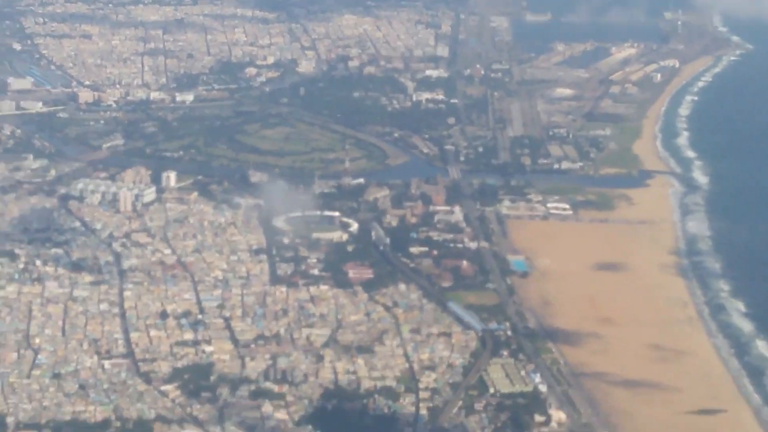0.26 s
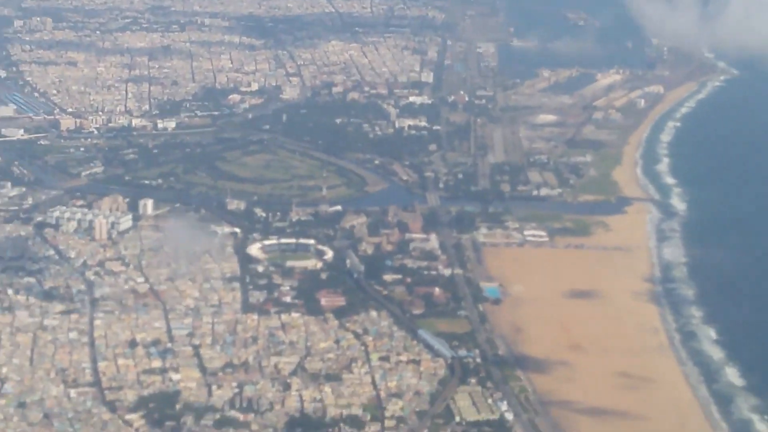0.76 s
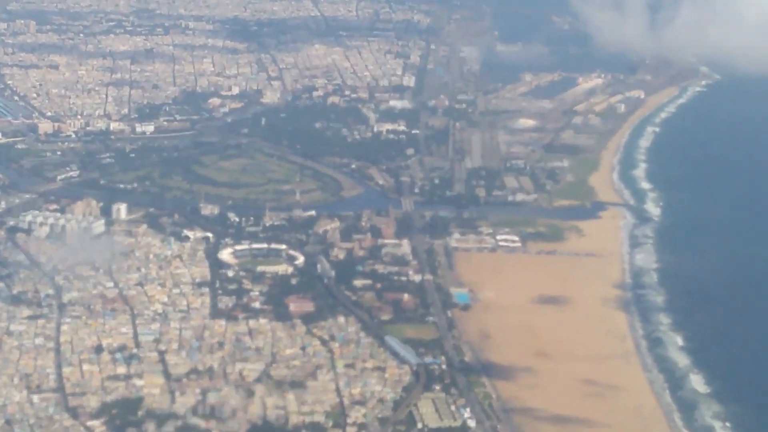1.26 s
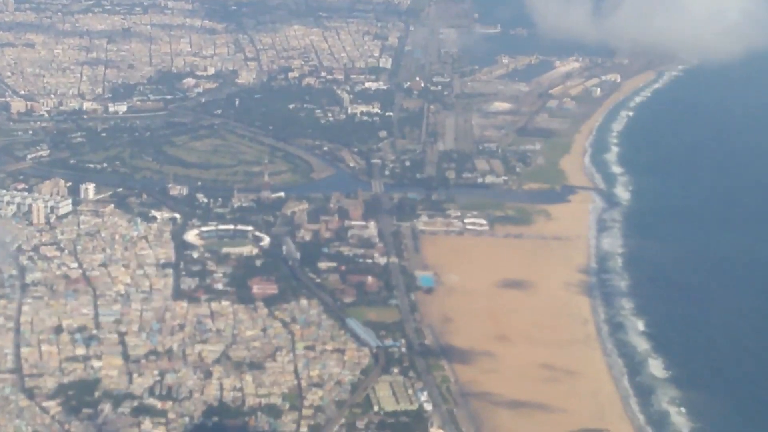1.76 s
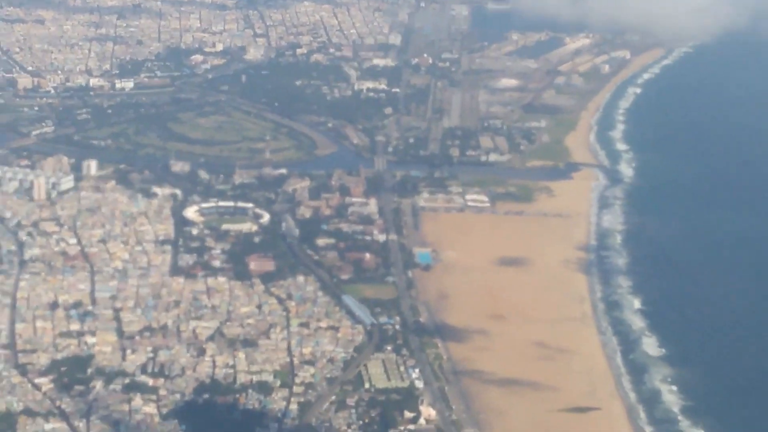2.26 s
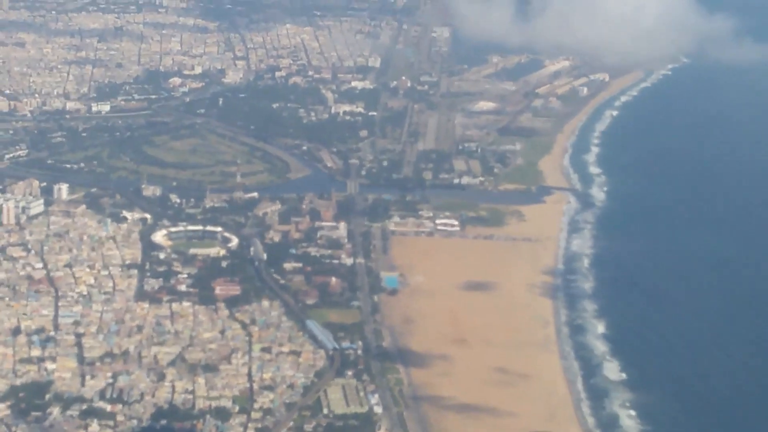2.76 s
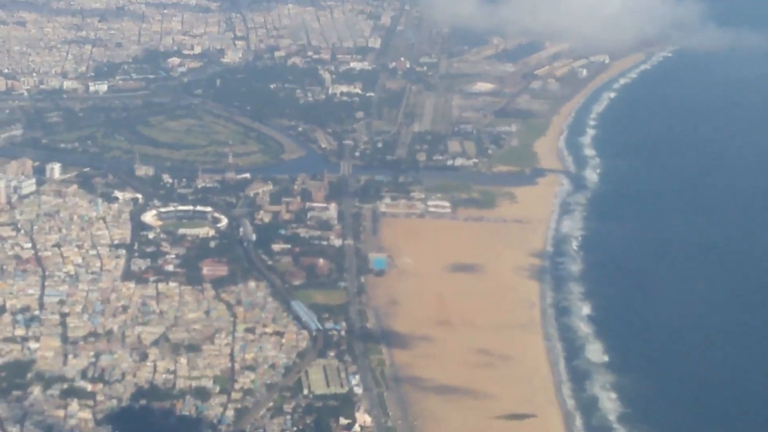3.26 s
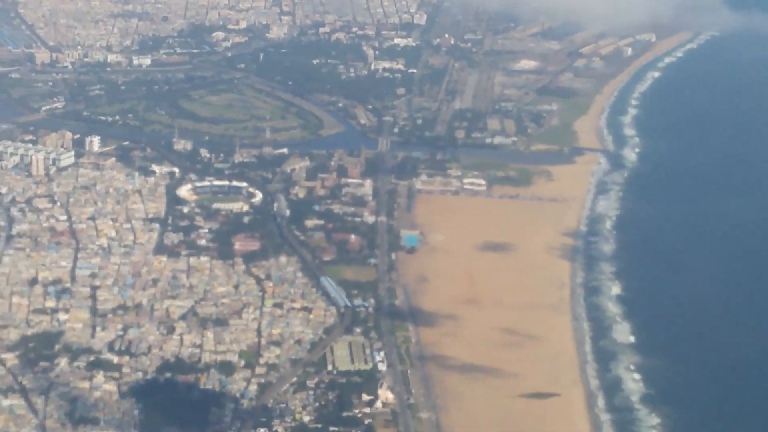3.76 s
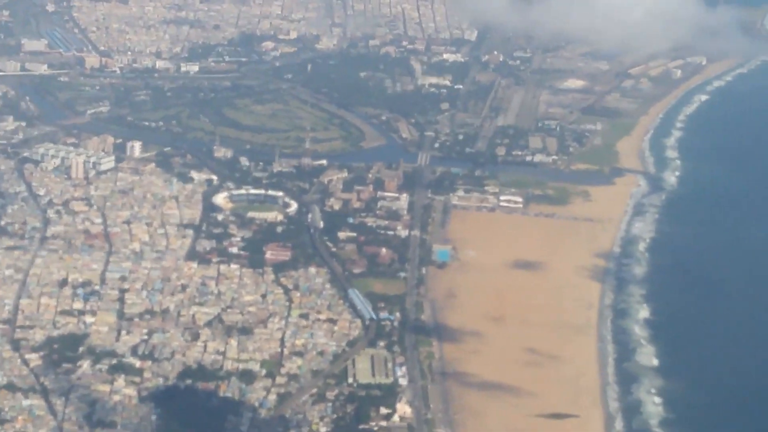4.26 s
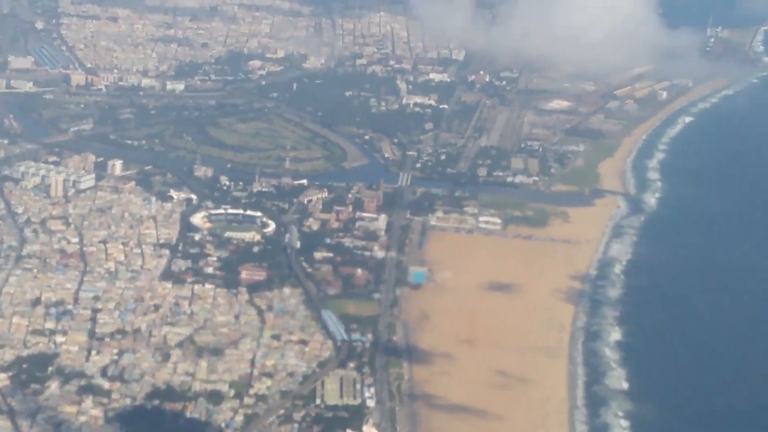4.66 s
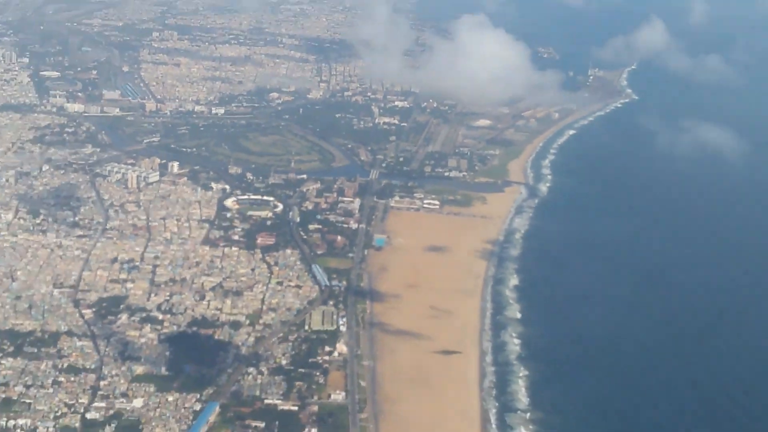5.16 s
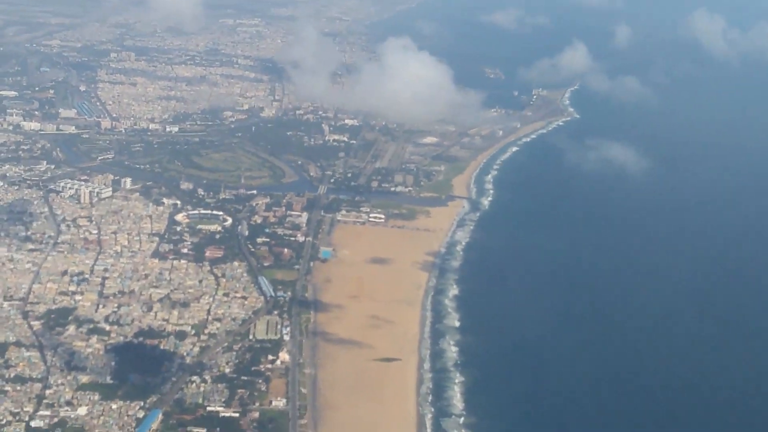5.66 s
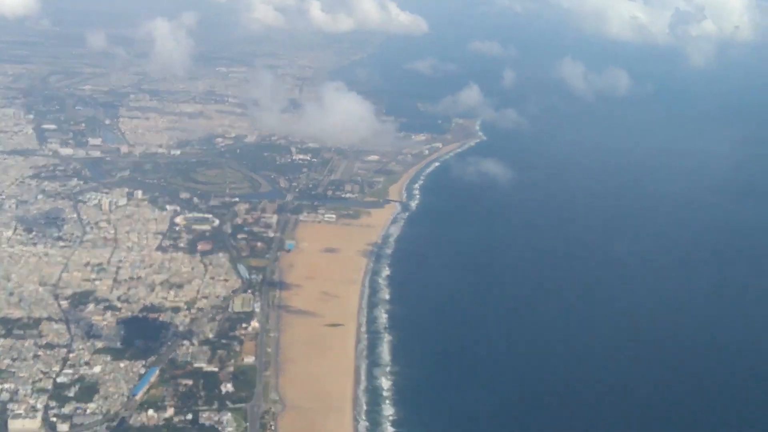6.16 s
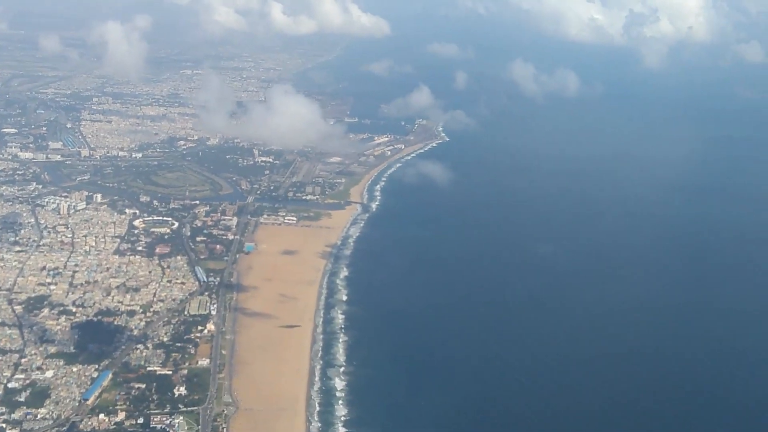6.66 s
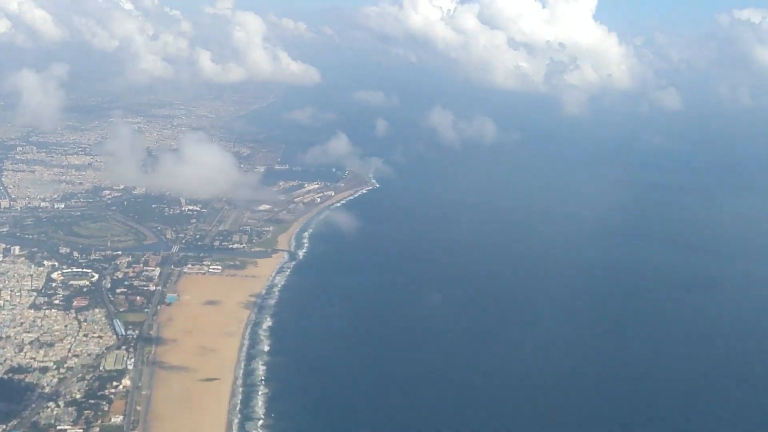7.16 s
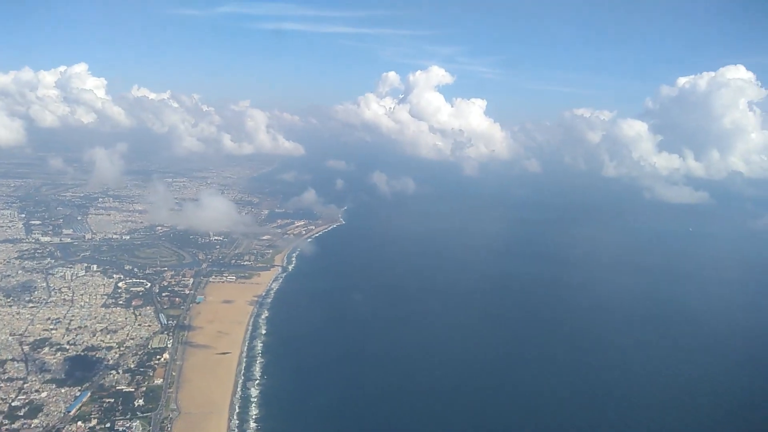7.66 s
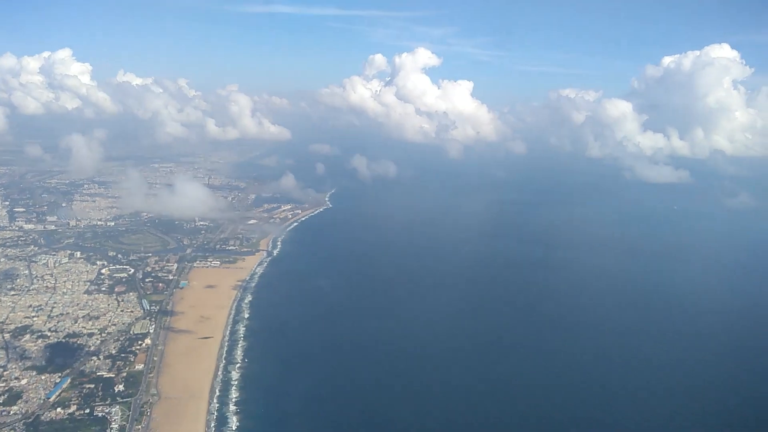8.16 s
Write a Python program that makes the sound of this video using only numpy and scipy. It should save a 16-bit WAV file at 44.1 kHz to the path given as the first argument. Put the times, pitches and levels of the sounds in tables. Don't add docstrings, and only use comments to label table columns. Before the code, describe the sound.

Loud, constant low jet roar inside an airliner cabin, with booming buffets and airflow rush, crushed into rough, crackling distortion by an overloaded small microphone.

```python
import sys
import numpy as np
from scipy import signal
from scipy.fft import rfft, irfft, next_fast_len
from scipy.io import wavfile
from scipy.ndimage import uniform_filter1d, minimum_filter1d

SR = 44100
rng = np.random.default_rng(int(sys.argv[2]) if len(sys.argv) > 2 else 0)


def transcribe(u):
    v = np.clip(np.atleast_2d(u).T, -1, 1)
    q = np.round(v * 32767).astype(np.int16)
    wavfile.write(sys.argv[1], SR, q)


def gain_from_db(level_db):
    decades = np.asarray(level_db, float) / 20
    return 10 ** decades


N = 370435
TIME_S = np.arange(N) / SR
COARSE_S = np.arange(0, N, 64) / SR


def evened(x):
    return x / np.sqrt(np.mean(x ** 2) + 1e-20)


def noise(spectrum):
    hz, db = np.transpose(spectrum)
    size = next_fast_len(N)
    bin_hz = np.fft.rfftfreq(size, 1 / SR)
    white = rfft(rng.standard_normal(size))
    shape_db = np.interp(np.log(bin_hz + 1), np.log(hz + 1), db)
    return evened(irfft(white * gain_from_db(shape_db), size)[:N])


def swells(rows, half_width_s):
    bells_db = sum(db * np.exp(-((COARSE_S - s) / half_width_s) ** 2) for s, db in rows)
    return np.interp(TIME_S, COARSE_S, bells_db)


def wander():
    rates_hz = np.geomspace(.5, 9, 30)
    waves = sum(np.sin(2 * np.pi * (hz * COARSE_S + rng.random())) for hz in rates_hz)
    return np.interp(TIME_S, COARSE_S, evened(waves))


# time in seconds, level in dB.
SHAFT_LEVELS = [(0.0, -22.5), (0.37, -14.5), (0.51, -32.5), (0.61, -20), (2.83, -22.5), (2.9, -32.5),
                (2.97, -19), (4.52, -23.5), (4.89, -14.5), (4.96, -23), (5.36, -17), (5.92, -22),
                (6.6, -17.5), (6.69, -32), (6.81, -17), (7.16, -23), (8.24, -17), (8.4, -27)]


def shaft_hum():
    s, db = np.transpose(SHAFT_LEVELS)
    shaft_hz, trim_db = 78.7, -1.5
    level_db = np.interp(TIME_S, s, db) + trim_db
    return np.sqrt(2) * gain_from_db(level_db) * np.sin(2 * np.pi * shaft_hz * TIME_S)


# centre in seconds, swell in dB.
BUFFETS = [(.16, 9), (.26, 8.5), (.37, 6), (1.0, 3), (1.38, 2.5), (2.06, 10), (2.4, 7.5), (3.44, 10),
           (4.49, 6.5), (4.61, 12), (4.91, 6), (5.17, 3), (5.89, 8.5), (6.88, 3), (7.24, 8.5), (7.51, 9.5),
           (7.78, 7), (8.0, 4.5), (8.28, 6)]


def buffet_swell_db():
    return swells(BUFFETS, half_width_s=0.04)


# centre in seconds, swell in dB.
SURGES = [(.09, 3), (.76, 8), (1.08, 0), (1.59, 7), (1.85, 3.5), (2.1, 1), (2.48, 0.5), (3.58, 9.5),
          (4.3, 4.5), (5.01, 2.5), (5.17, 3.5), (5.96, 5.5), (6.64, 4.5), (7.39, 1.5), (7.7, 1.5),
          (7.95, 6), (8.05, 6), (8.28, 5)]


def surge_swell_db():
    return swells(SURGES, half_width_s=0.039)


# frequency in Hz, density in dB per Hz.
RUSH_SPECTRUM = [(150, -25.5), (225, -3), (245, -1), (260, 4.5), (280, -0.5), (340, -2), (450, -19),
                 (700, -21.5), (1200, -43.5), (2500, -68), (6000, -62), (11000, -71), (16000, -77.5)]


def air_rush():
    level_db = -19.5 - 0.31 * buffet_swell_db() + 1.25 * wander()
    return gain_from_db(level_db) * noise(RUSH_SPECTRUM)


# frequency in Hz, density in dB per Hz.
BOOM_SPECTRUM = [(20, -10), (40, 0.5), (55, 2.5), (68, -2), (90, -23.5), (200, -78)]


def hull_boom():
    level_db = -20 + buffet_swell_db() - 0.8 * surge_swell_db() + 1.5 * wander()
    return gain_from_db(level_db) * noise(BOOM_SPECTRUM)


# frequency in Hz, density in dB per Hz.
ROAR_SPECTRUM = [(60, -34), (88, -2.5), (112, -2.5), (137, 0), (170, 2.5), (190, -4.5), (210, -1.5),
                 (240, -14), (500, -77)]


def jet_roar():
    level_db = -17.5 + surge_swell_db() - 0.18 * buffet_swell_db() + 1.5 * wander()
    return gain_from_db(level_db) * noise(ROAR_SPECTRUM)


def scene():
    return (shaft_hum() + air_rush() + hull_boom() + jet_roar())[None]


def port_resonance(x):
    port_hz, width_hz = 12000, 600
    turn = np.exp(2j * np.pi * port_hz * TIME_S)
    r = np.exp(-np.pi * width_hz / SR)
    return 2 * (turn * signal.lfilter([1 - r], [1, -r], x / turn)).real


def capsules(x):
    front_drive_db, rear_drive_db, rear_share = 19.5, 32.5, 0.098
    front = x + gain_from_db(-26) * port_resonance(x)
    rear = signal.lfilter(*signal.butter(2, 365, fs=SR), x)
    front = np.clip(gain_from_db(front_drive_db) * front, -1, 1)
    rear = np.clip(gain_from_db(rear_drive_db) * rear, -1, 1)
    squeeze, squeeze_s = 1, 0.0057
    span = int(squeeze_s * SR)
    power = uniform_filter1d(uniform_filter1d(evened(x) ** 2, span), span)
    return ((1 - rear_share) * front + rear_share * rear) * (power + 0.27) ** (-squeeze / 2)


# time in seconds, peak in dB.
SLIPS = [(0.206, -28), (0.5367, -20.5), (0.976, -44), (1.105, -21), (1.3917, -23), (1.5783, -25),
         (1.7883, -25), (2.122, -26), (2.1554, -28), (2.353, -20), (2.4189, -25), (2.6596, -22),
         (2.703, -18), (2.9003, -25), (2.9838, -22), (3.2555, -25), (3.3676, -21), (3.4364, -24),
         (3.8495, -23), (5.12, -24), (5.171, -21), (5.281, -18.5), (5.3612, -27), (5.4893, -29),
         (5.884, -18), (6.8224, -28), (7.0838, -18), (7.2657, -24), (7.6306, -26), (7.9872, -31)]


def slips(x):
    s, db = np.transpose(SLIPS)
    small_count, small_db, spread_db = 40, -32.5, 8.5
    when, size = rng.random((small_count, 2)).T
    s = np.r_[s, .99 * when * N / SR]
    db = np.r_[db, small_db + spread_db * (2 * size - 1)]
    at = (s * SR).astype(int) + 60
    kicks = np.zeros(N)
    kicks[at] = gain_from_db(np.minimum(db + 21, -5)) * np.sign(x[at])
    edge = np.ones(5) / 5
    return signal.lfilter(edge, [1, -np.exp(-2 * np.pi * 15 / SR)], kicks)


# frequency in Hz, density in dB per Hz.
HISS_SPECTRUM = [(800, 10.5), (2000, -4), (4000, -19), (6200, -20.5), (8000, -30), (11300, -32),
                 (12000, -25), (12700, -36), (16000, -44)]


def amplifier_hiss():
    return gain_from_db(-32.5) * noise(HISS_SPECTRUM)


# corner in Hz, Q as a ratio.
BASS_CUT = [
    (48, 3.37),
    (50, 0.64),
    (88, 0.92),
]


def bass_cut(x):
    for hz, q in BASS_CUT:
        w = 2 * np.pi * hz
        x = signal.lfilter(*signal.bilinear([1, 0, 0], [1, w / q, w ** 2], SR), x)
    return x


def limiter(x):
    ceiling_db, headroom_db = -6.05, 1.3
    look_s, release_db_per_s = 0.0023, 453.5
    over_db = np.maximum(20 * np.log10(abs(x) + 1e-9) - ceiling_db - headroom_db, 0)
    fall_db = TIME_S * release_db_per_s
    held_db = np.maximum.accumulate(over_db + fall_db) - fall_db
    span = int(look_s * SR)
    ahead_db = -minimum_filter1d(-held_db, span)
    u = x / gain_from_db(uniform_filter1d(ahead_db, span) + ceiling_db)
    return gain_from_db(ceiling_db) * u / (1 + u ** 12) ** (1 / 12)


# centre in seconds, length in seconds, upper edge left in Hz.
DROPOUTS = [(0.231, 0.01, 3250), (1.423, 0.0077, 3100), (3.131, 0.0069, 2620), (3.304, 0.0057, 2600),
            (3.749, 0.0077, 3000), (3.815, 0.0064, 3020), (4.625, 0.0061, 2800), (4.796, 0.0079, 3060),
            (6.545, 0.0094, 2720), (7.056, 0.0088, 3150), (7.164, 0.0071, 2650)]


def treble_dropouts(x):
    smear_db, smear_width_hz, smear_half_s = -46.5, 350, 0.012
    out, span = x.copy(), int(smear_half_s * SR)
    for s, length_s, edge_hz in DROPOUTS:
        part = slice(int((s - 1.5 * length_s) * SR), int((s + 1.5 * length_s) * SR))
        high = signal.butter(16, edge_hz, "high", fs=SR, output="sos")
        treble = signal.sosfiltfilt(high, x[part])
        out[part] -= treble * signal.windows.tukey(len(treble), .9)
        band = signal.butter(3, [edge_hz - smear_width_hz, edge_hz], "band", fs=SR, output="sos")
        smear = evened(signal.sosfiltfilt(band, rng.standard_normal(2000))[:2 * span])
        start = int(s * SR) - span
        out[start:start + 2 * span] += gain_from_db(smear_db) * smear * signal.windows.tukey(2 * span, .4)
    return out


def roll_off(x):
    return signal.sosfilt(signal.butter(12, 15710, fs=SR, output="sos"), x)


def record(dry):
    treble_roll_off = signal.butter(1, 11400, fs=SR)
    x = signal.lfilter(*treble_roll_off, capsules(dry[0]) + slips(dry[0]))
    x = x + gain_from_db(-10) * port_resonance(x) + amplifier_hiss()
    x = limiter(gain_from_db(-3) * bass_cut(x))
    x = treble_dropouts(x)
    band_edge = signal.firwin(801, 15500, window=("kaiser", 9), fs=SR)
    x = signal.oaconvolve(x, band_edge, "same")
    x *= np.minimum(np.minimum(np.arange(N), np.arange(N)[::-1]) / 100, 1)
    return roll_off(x[None])


dry = scene()
out = record(dry)
transcribe(out)
```